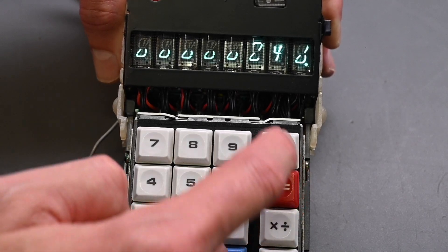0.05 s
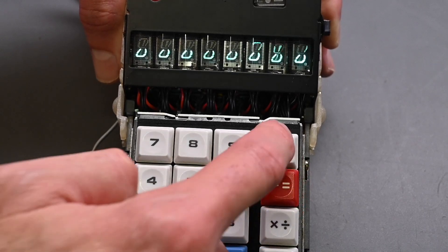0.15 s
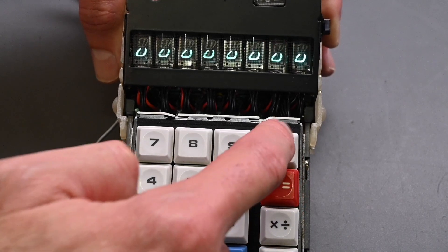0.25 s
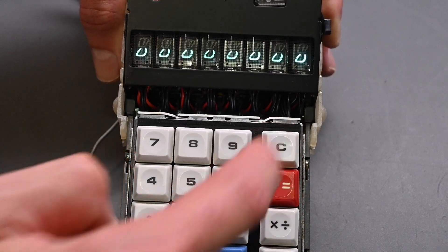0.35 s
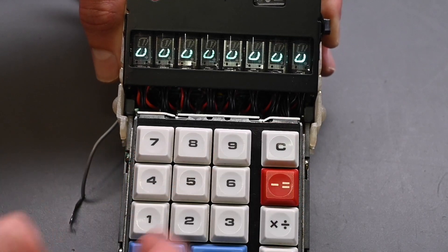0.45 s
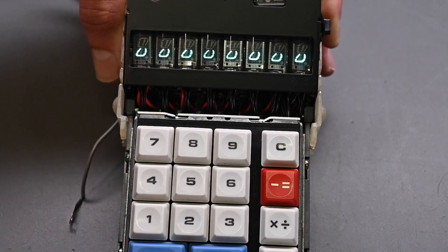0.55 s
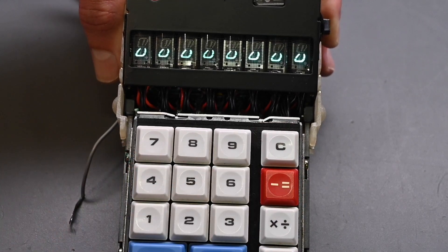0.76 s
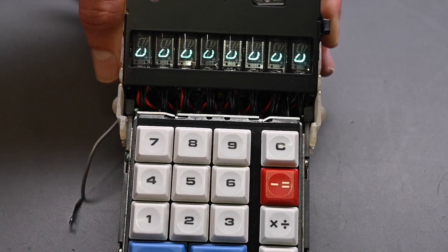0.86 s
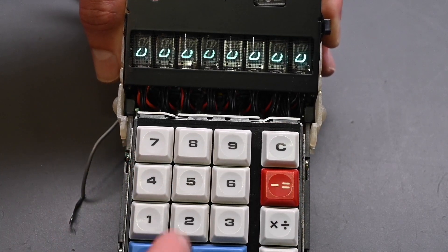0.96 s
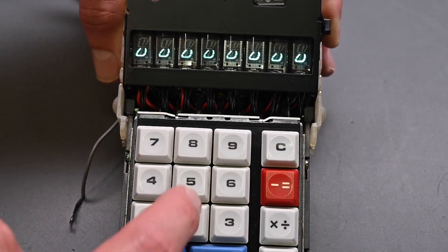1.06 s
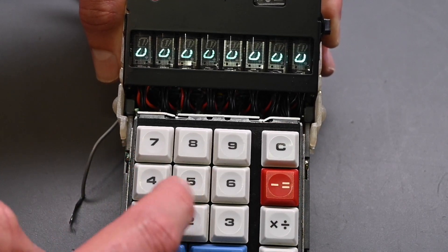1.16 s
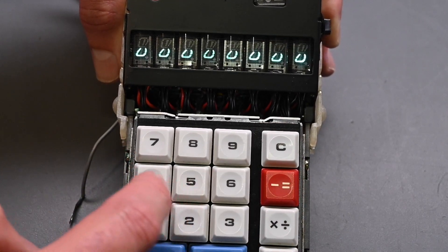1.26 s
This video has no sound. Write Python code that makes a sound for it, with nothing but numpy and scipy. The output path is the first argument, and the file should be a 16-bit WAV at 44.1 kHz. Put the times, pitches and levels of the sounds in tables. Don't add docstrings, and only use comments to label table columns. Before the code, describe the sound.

A single calculator key press, close up in a quiet room. At 0.21 seconds a fingertip ticks on the hard plastic cap; at 0.26 the key bottoms out with a bright clack and soft low bench thud. At 0.38 it springs back with a crisp snap and hollow case knock. Short room echo, faint fan hum and hiss; barely audible low bumps near 0.72 and 0.78.

```python
import sys
import numpy as np
from scipy import signal
from scipy.fft import rfft, irfft
from scipy.io import wavfile

SR = 44100
rng = np.random.default_rng(int(sys.argv[2]) if len(sys.argv) > 2 else 0)


def how_loud(loudness_db):
    steps = np.asarray(loudness_db, float) / 20
    return 10 ** steps


def materialize(psi):
    bounded = np.clip(np.atleast_2d(psi).T, -1, 1)
    quanta = np.round(bounded * 32767).astype(np.int16)
    wavfile.write(sys.argv[1], SR, quanta)


N = 57330

# peak level in dB, time for the rattle to fall 60 dB in seconds,
# room echo level in dB, lowest frequency in Hz.
CONTACTS = [
    (-20.5, 0.031, -30.5, 3200),
    (-20, 0.066, -30.5, 2480),
    (-19.5, 0.041, -29.5, 330),
]
# time in seconds, level in dB.
KNOCK_TIMES = [
    [(.2106, -17), (.2112, 0), (.2119, -5), (.2126, -4), (.21345, -6)],
    [(.2586, -12), (.2592, 0), (.2598, -5), (.2614, -4), (.2622, -6), (.2657, -12)],
    [(.3806, -14), (.3811, 0), (.3818, -4), (.38265, -4), (.3837, -9), (.3855, -10)],
]
RINGING_DB = [-21, -23, -20]


def unit(x):
    return x / np.sqrt(np.mean(x ** 2) + 1e-20)


def at_hz(points, hz):
    point_hz, point_db = np.array(points).T
    return np.interp(np.log(hz + 1), np.log(point_hz), point_db)


def colour(x, points):
    gain_db = at_hz(points, np.fft.rfftfreq(N, 1 / SR))
    return irfft(rfft(x) * how_loud(gain_db), N)


def peak(x, hz, width_hz):
    r = np.exp(-np.pi * width_hz / SR)
    top = np.array([1, 0, -1]) * (1 - r * r) / 2
    bottom = [1, -2 * r * np.cos(2 * np.pi * hz / SR), r * r]
    return signal.lfilter(top, bottom, x + 1e-18)


def ring(x, modes, sign=-1):
    out = 0
    for k, (hz, db, t60) in enumerate(modes):
        r = how_loud(-60 / (t60 * SR))
        w = 2 * np.pi * hz / SR
        tone = signal.lfilter([0, np.sin(w)], [1, -2 * r * np.cos(w), r * r], x + 1e-18)
        out = out + sign ** k * how_loud(db) * tone
    return out


def drift(rate):
    knots = rng.standard_normal(200)
    return np.interp(np.arange(N) / SR * rate, np.arange(200), knots)


def dying(start, t60):
    rise_s = .0004
    t = np.arange(N) / SR - start
    rise = np.exp(np.clip(t / rise_s * 2, -50, 0)) * (t > -2 * rise_s)
    fall = how_loud(-60 * np.maximum(t, 0) / t60)
    return np.where(t < 0, rise, fall)


def background():
    # frequency in Hz, level in dB.
    hiss_spectrum = [(18, -57), (30, -6), (506, -10), (752, -8), (1180, -17.5), (1660, -32), (2050, -22.5),
                     (14800, -28), (16500, -45)]
    # frequency in Hz, width in Hz, level in dB.
    fan_resonances = [(130, 70, -9), (250, 80, -14), (670, 40, -9), (740, 30, 0), (775, 20, -3),
                      (860, 40, -8), (1420, 200, -16), (1620, 120, -12), (3700, 60, -19), (8750, 40, -22),
                      (15550, 300, -28)]
    # frequency in Hz, rms level in dB.
    motor_tones = [(838, -78), (1676, -80)]
    hiss_db, fan_db, fan_wander_db = -64.5, -66.5, 2.8

    fan = 0
    for hz, width_hz, db in fan_resonances:
        level = how_loud(db + fan_wander_db * drift(7.72))
        fan = fan + level * peak(rng.standard_normal(N), hz, width_hz)
    turn = 2 * np.pi * np.arange(N) / SR + np.cumsum(drift(12)) * 0.02045 / SR
    motor = sum(how_loud(db + 4 + 3.4 * drift(15.54)) * np.sin(hz * turn) for hz, db in motor_tones)
    hiss = unit(colour(rng.standard_normal(N), hiss_spectrum))
    return how_loud(hiss_db - 4) * hiss + how_loud(fan_db) * unit(fan) + motor


def rumble():
    # start in seconds, level in dB, time to fall 60 dB in seconds, centre in Hz, width in Hz.
    blows = [
        (.262, -50, .35, 380, 330),
        (.386, -55, .3, 450, 600),
        (.384, -52, .08, 15550, 500),
        (.213, -54, .08, 3420, 600),
        (.382, -46.5, .14, 9480, 600),
    ]
    out = 0
    for start, db, t60, hz, width_hz in blows:
        noise = peak(rng.standard_normal(N), hz, width_hz)
        out = out + how_loud(db) * unit(peak(noise, hz, width_hz)) * dying(start, t60)
    return out


def thud(pushes, modes):
    force = np.zeros(N)
    for start, db, soft_hz in pushes:
        t = np.maximum(np.arange(N) / SR - start, 0) * 2 * np.pi * soft_hz
        pulse = t * np.exp(-t)
        force += how_loud(db) * pulse / pulse.sum()
    return ring(force, modes, sign=0.86)


def bench_thud():
    # time in seconds, level in dB, softness in Hz.
    pushes = [
        (.2608, -43.5, 533),
        (.2672, -31.5, 400.),
        (.715, -59.5, 148),
        (.775, -52.5, 145),
    ]
    # frequency in Hz, level in dB, time to fall 60 dB in seconds.
    modes = [(71.4, -15, 0.12), (103.4, -13, 0.49), (160.6, 3, 0.095), (189.4, -1, 0.26),
             (231, -10.5, 0.33), (297.4, -23.5, 0.45), (383, -11.5, 0.27), (525, -18, 0.086),
             (624, -22, 0.088)]
    return thud(pushes, modes)


def case_thud():
    # time in seconds, level in dB, softness in Hz.
    pushes = [
        (.3815, -45.5, 2000.),
        (.3895, -42.5, 2010),
    ]
    # frequency in Hz, level in dB, time to fall 60 dB in seconds.
    modes = [(204.3, -6.5, 0.22), (272, -10, 0.18), (400, -10.5, 0.08), (670, -2, 0.054), (766, -2, 0.13),
             (880, -49, .03)]
    return thud(pushes, modes)


def rubbing():
    # start in seconds, length in seconds, level in dB.
    slides = [
        (.249, .007, -54),
        (.3178, .001, -54),
        (.366, .012, -58),
        (.412, .002, -59),
    ]
    hz, width_hz, grains_per_s, t60_s = 6000, 2800, 4000, .045
    grains = (rng.random(N) < grains_per_s / SR) * rng.standard_normal(N)
    grains = unit(peak(peak(grains, hz, width_hz), hz, 2 * width_hz))
    t = np.arange(N) / SR
    loudness = 0
    for start, length, db in slides:
        swell = np.clip((t - start) / length, 0, 1) ** .5
        fade = how_loud(-60 * np.maximum(t - start - length, 0) / t60_s)
        loudness = loudness + how_loud(db) * swell * fade
    return grains * loudness


def contact(which, body, modes):
    # frequency in Hz, level in dB.
    room_colour = [(900, 0.5), (2000, -6), (4000, 0), (7000, -1.5), (9600, 1.5), (12000, -4), (15500, 1.5),
                   (17000, -23)]
    room_t60_s, room_high_t60_s, rattle_db = 0.36, 0.067, -25
    db, rattle_t60, room_db, low_hz = CONTACTS[which]
    times, knock_db = np.transpose(KNOCK_TIMES[which])
    main = times[1]

    knocks = np.zeros(N)
    knocks[(times * SR).astype(int)] = how_loud(knock_db) * (-1) ** np.arange(len(times))
    rattle = rng.standard_normal(N) * np.abs(rng.standard_normal(N))
    rattle = rattle * how_loud(rattle_db) * dying(main, rattle_t60)

    click = 0
    for i, (hz, width_hz, body_db) in enumerate(body):
        gain = (-1) ** i * how_loud(body_db) * 1000 / width_hz
        click = click + gain * peak(knocks + rattle, hz, width_hz)
    click = click / np.abs(click).max()
    click = click + how_loud(RINGING_DB[which]) * ring(knocks + rattle / 2, modes)

    air = unit(colour(rng.standard_normal(N), room_colour))
    low = signal.lfilter([.35, .35], [1, -.3], air)
    echo = low * dying(main + 0.0037, room_t60_s) + (air - low) * dying(main + 0.0047, room_high_t60_s)
    low_cut = signal.butter(3, low_hz, "high", fs=SR, output="sos")
    return how_loud(db) * signal.sosfilt(low_cut, click + echo * how_loud(room_db))


def touch():
    # frequency in Hz, width in Hz, level in dB.
    body = [(3150, 290, -19.5), (4690, 310, -8), (7520, 990, 0.5), (10270, 690, -4), (13400, 2200, -10),
            (16400, 530, -7)]
    # frequency in Hz, level in dB, time to fall 60 dB in seconds.
    modes = [(3290, -7, .035), (3530, -11, .025), (4820, -5, .025), (7200, -6, .025), (7570, -7, .03),
             (15020, -8, .035), (15480, -9, .035)]
    return contact(0, body, modes)


def bottom_out():
    # frequency in Hz, width in Hz, level in dB.
    body = [(1940, 360, -11), (3340, 267, -8), (4920, 420, -5), (5570, 700, -4.5), (6980, 780, 1),
            (8820, 1700, 5), (11850, 1060, -3), (13800, 1000, -15), (15370, 1500, 0.5)]
    # frequency in Hz, level in dB, time to fall 60 dB in seconds.
    modes = [(3340, -8, .02), (5800, -10, .025), (7100, -4, .025), (8860, -8, .025), (14980, -8, .025)]
    return contact(1, body, modes)


def spring_back():
    # frequency in Hz, width in Hz, level in dB.
    body = [(1824, 380, -9), (2700, 770, -6), (3670, 300, -14.5), (4500, 360, -12.5), (5670, 130, -8.5),
            (7080, 350, -6.5), (8400, 290, -1.5), (9980, 2300, 5), (13600, 1200, -6), (16120, 500, 0.5)]
    # frequency in Hz, level in dB, time to fall 60 dB in seconds.
    modes = [(1780, -6, .025), (2400, -10, .015), (5680, -4, .02), (6820, -5, .025), (8520, -3, .018),
             (9400, -9, .06), (9650, -6, .04), (15600, -10, .03)]
    return contact(2, body, modes)


def scene():
    # frequency in Hz, level in dB.
    key_width = [(30, -40), (1000, -36), (2200, -22), (8000, -16.5), (15000, -11)]
    background_width = [(30, -22), (200, -19), (600, -26.5), (1500, -31.5), (2200, -7.5), (5000, -5),
                        (9000, -2), (15000, -0.5)]

    key = touch() + bottom_out() + spring_back() + rubbing()
    key = key - .9 * peak(key, 4020, 500)
    key = key + rumble()
    mid = key + bench_thud() + case_thud() + background()

    direct = key * sum(dying(knocks[0][0], .04) for knocks in KNOCK_TIMES)
    side = colour(signal.hilbert(direct).imag, key_width)
    side = side + colour(background(), background_width)
    return np.array([mid + side, mid - side])


def top_cut(x):
    return signal.sosfilt(signal.butter(12, 16990, fs=SR, output="sos"), x)


def record(dry):
    low_cut_hz, cutoff_hz = 83.5, 15950
    low_cut = signal.butter(4, low_cut_hz, "high", fs=SR, output="sos")
    high_cut = signal.ellip(10, .5, 45, cutoff_hz - 100, fs=SR, output="sos")
    mix = signal.sosfilt(high_cut, signal.sosfilt(low_cut, dry))
    return top_cut(mix)


dry = scene()
out = record(dry)
materialize(out)
```